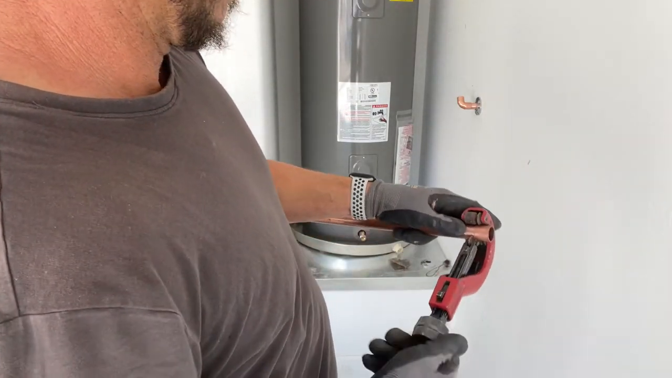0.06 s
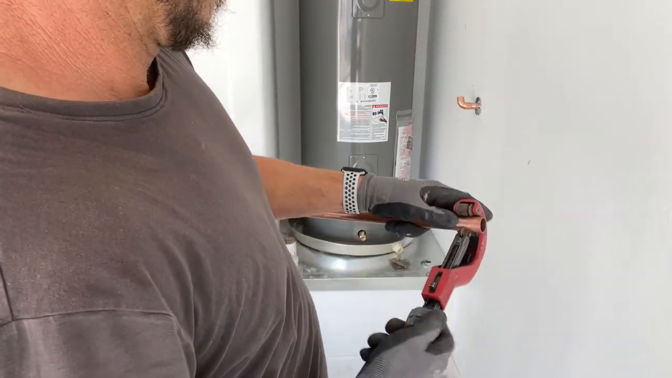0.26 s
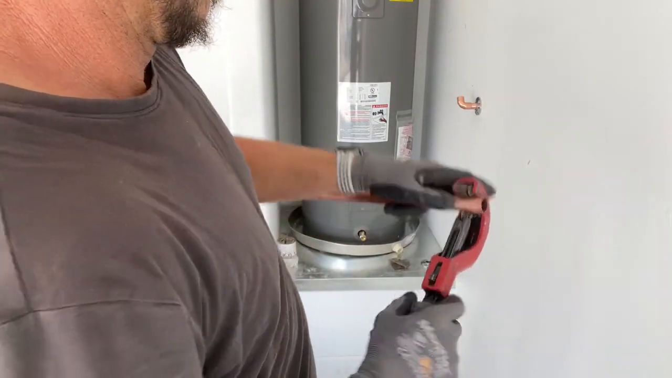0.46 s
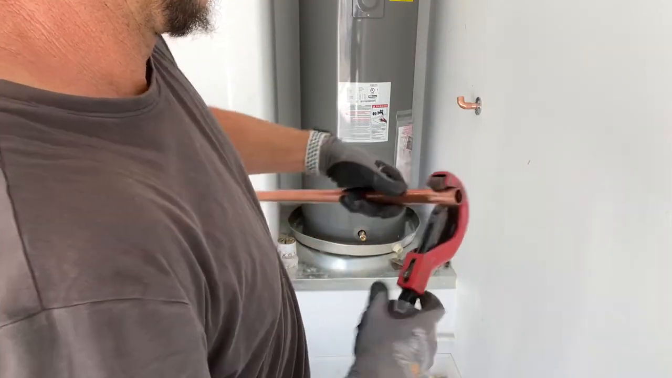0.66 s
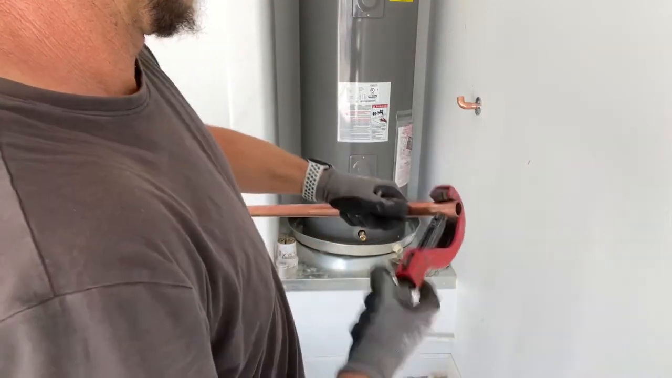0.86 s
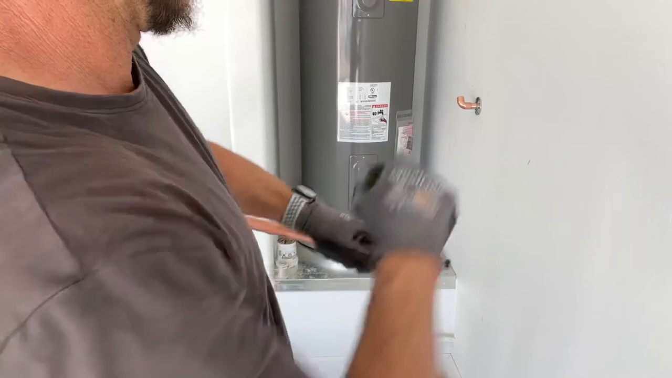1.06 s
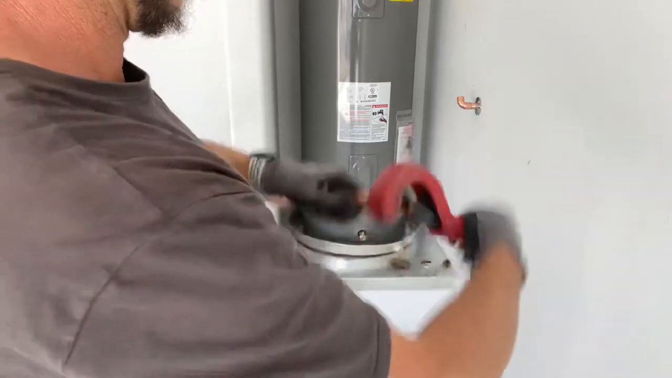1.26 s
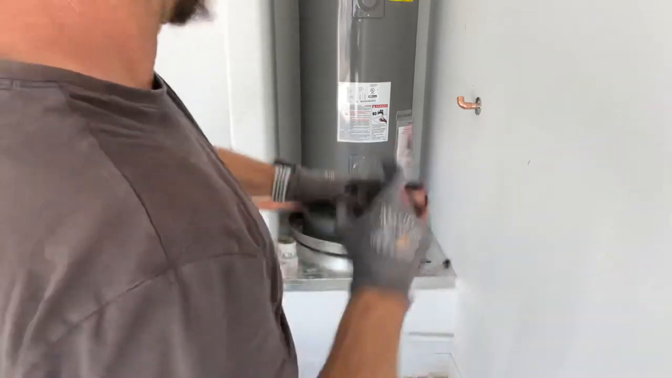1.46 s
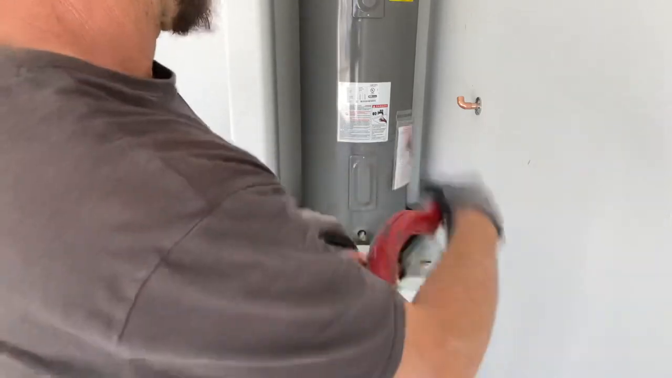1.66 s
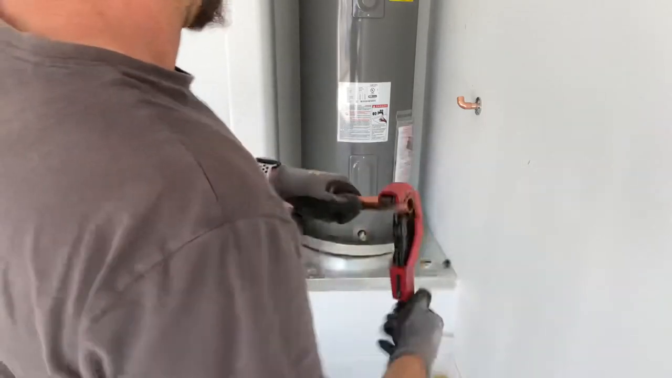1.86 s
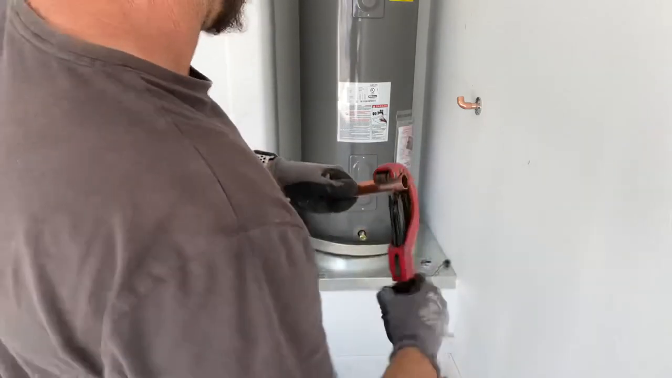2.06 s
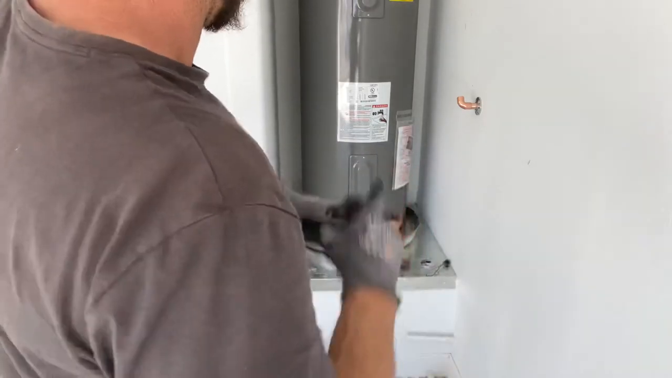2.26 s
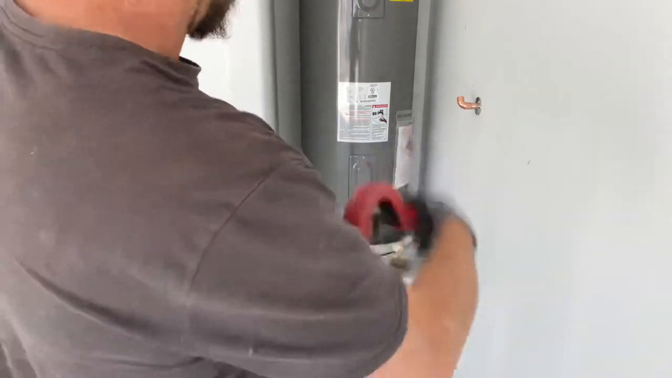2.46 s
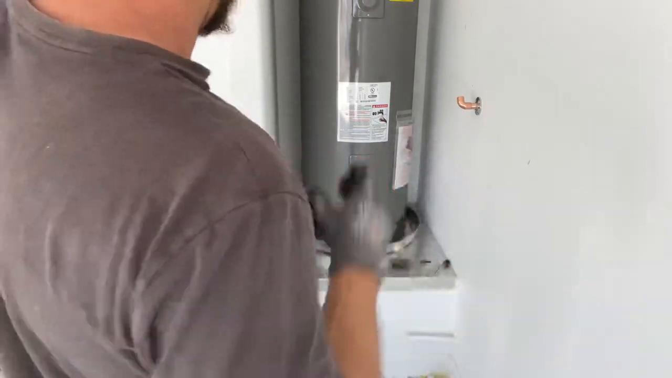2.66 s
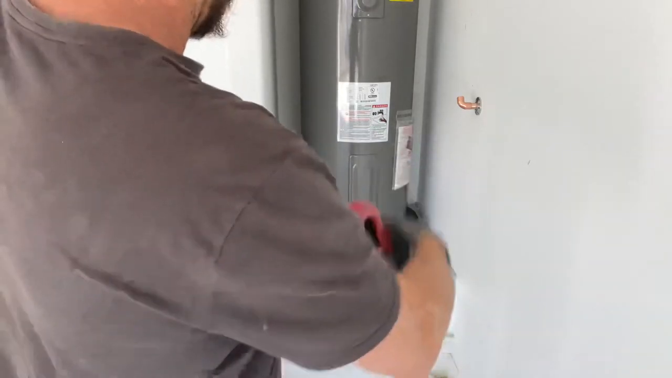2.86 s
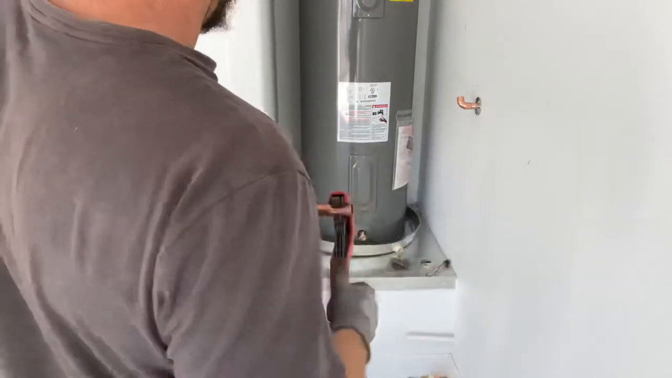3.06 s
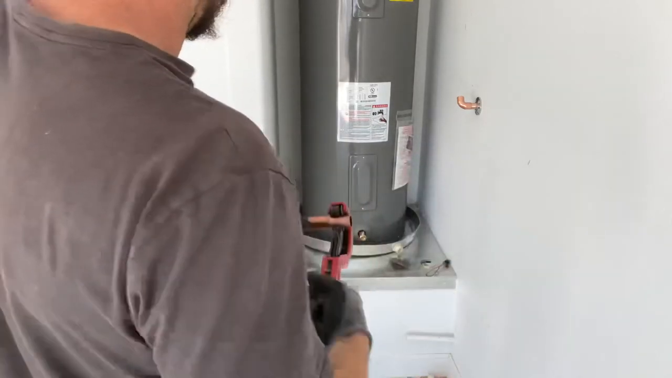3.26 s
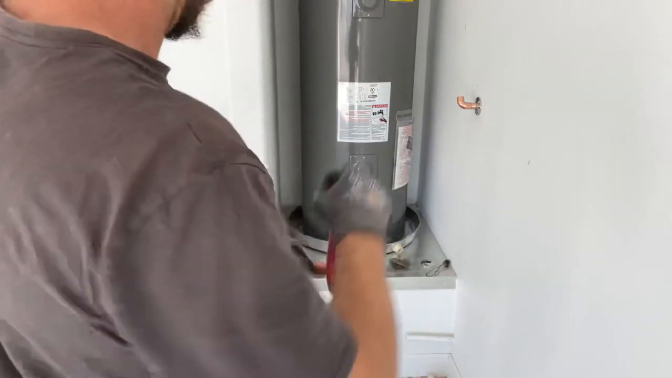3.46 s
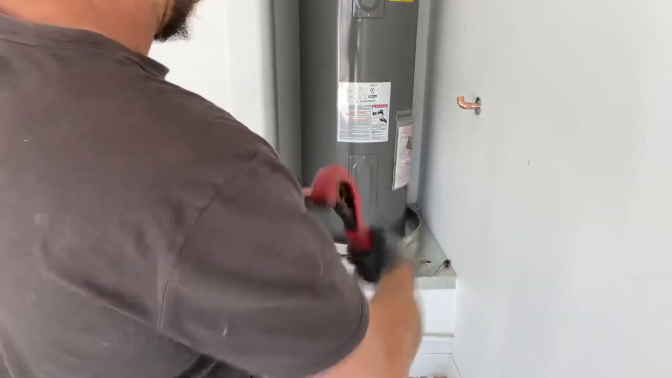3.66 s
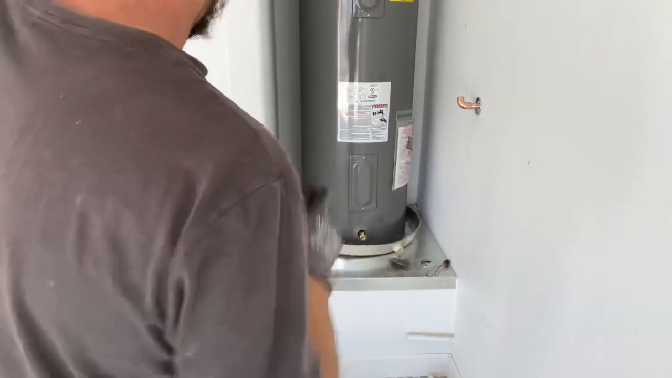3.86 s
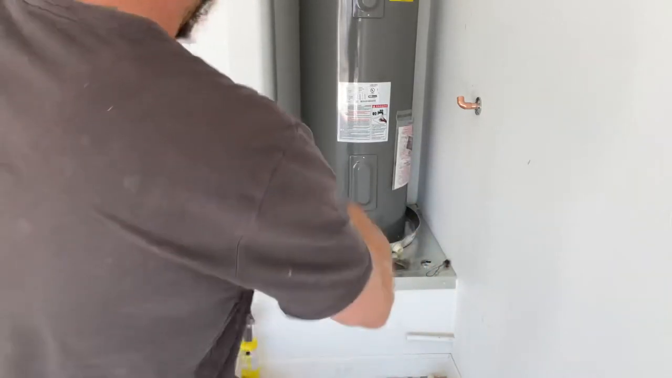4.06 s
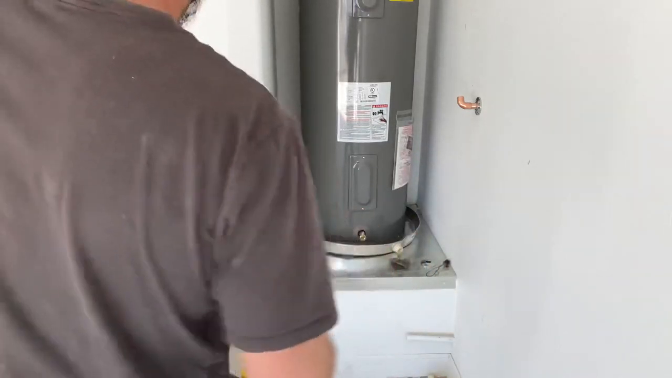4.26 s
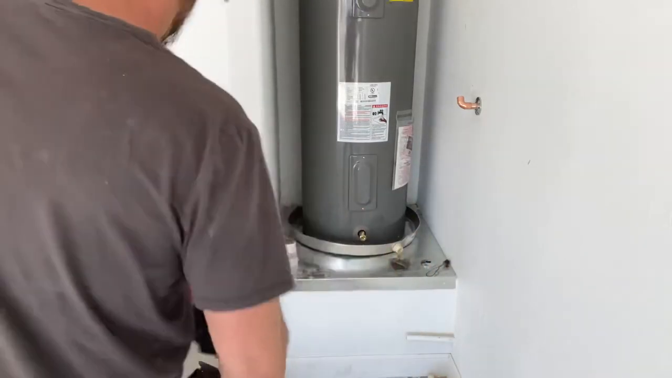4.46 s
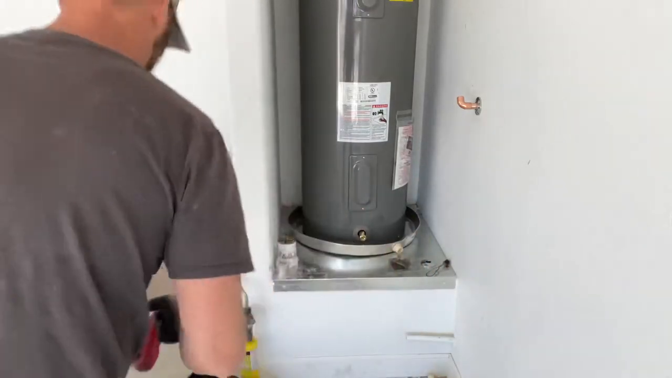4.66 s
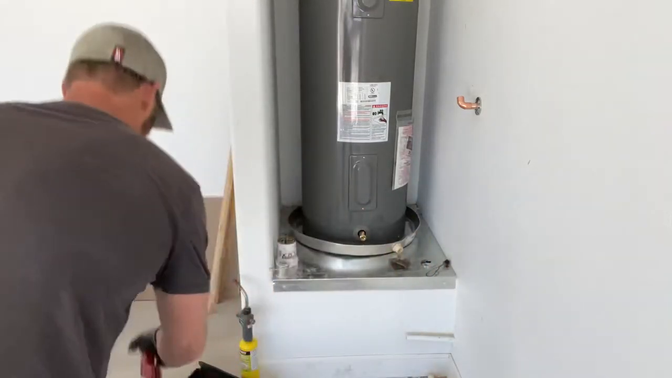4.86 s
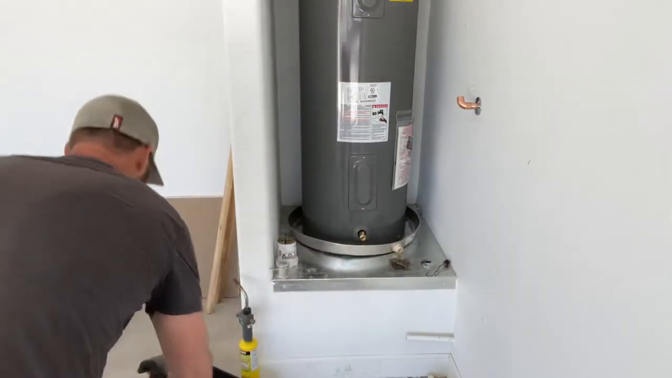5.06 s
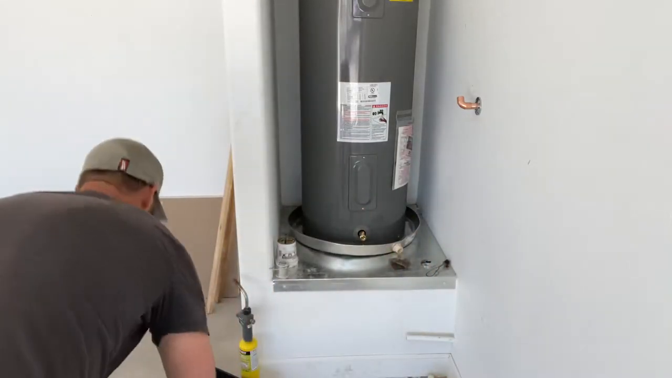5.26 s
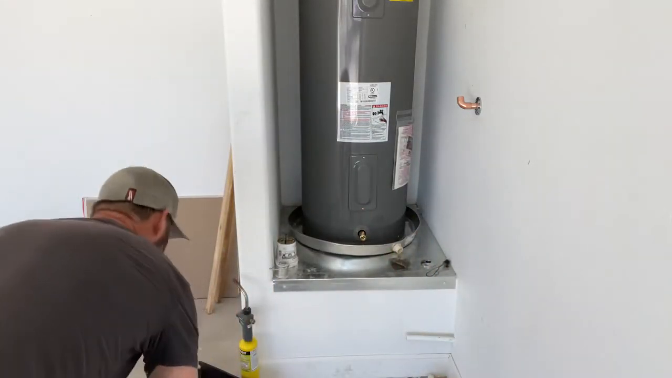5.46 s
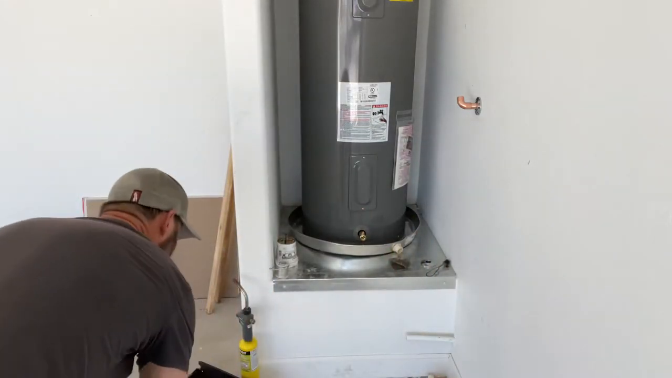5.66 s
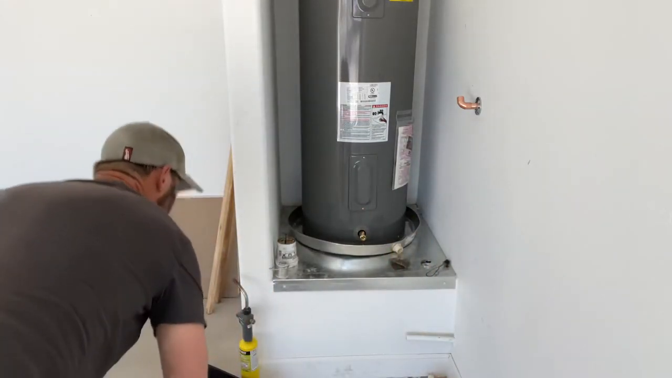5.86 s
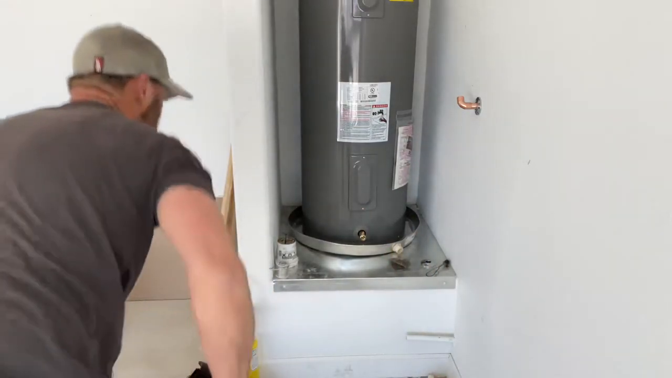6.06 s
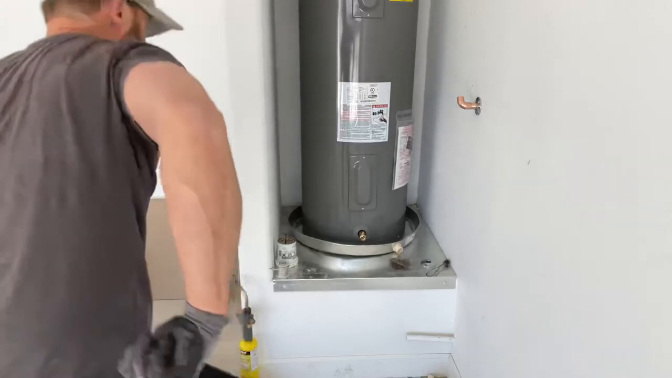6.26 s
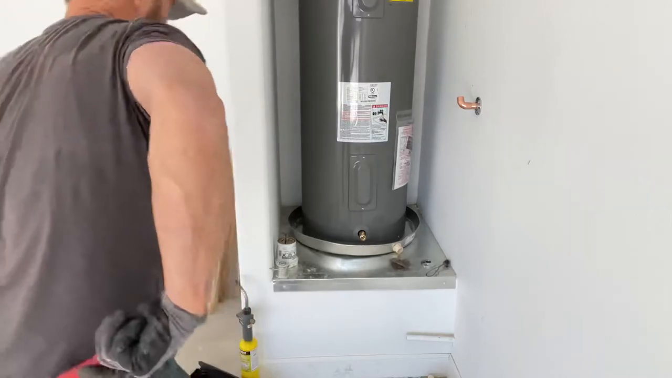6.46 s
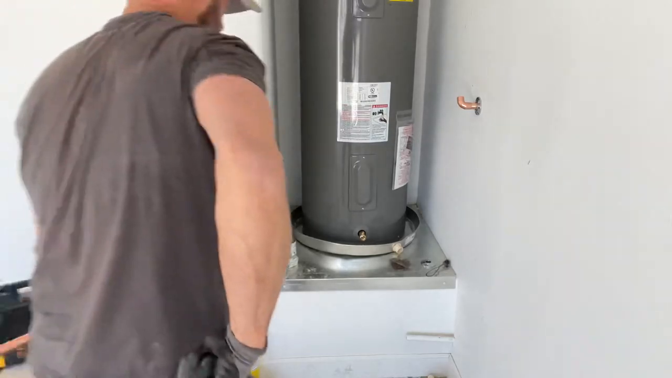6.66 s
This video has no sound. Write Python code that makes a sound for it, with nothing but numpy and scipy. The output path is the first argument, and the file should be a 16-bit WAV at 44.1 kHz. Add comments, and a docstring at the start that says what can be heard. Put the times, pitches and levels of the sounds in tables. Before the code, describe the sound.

A bare, hard-walled room with a quiet, wavering low hum, soft rumble and air throughout, heard fairly close in stereo. From 0 to 1 s a tubing cutter gives small, sparse clicks with light glove rubbing. At about 1.2 s the clicks become firmer, clustering around 1.5 to 1.7 s, with strong ones near 2.2, 2.4 and 2.7 s among scraping rustle and cloth swishes. A quieter stretch of handling follows, with faint clicks from 3.4 s, a clearer one at 3.8 s and a crisp, loud group at 4.75 s. Small clicks continue to 5.4 s. At 5.47 s a tiny metal piece chinks brightly and bounces; from 5.63 to 5.8 s the tube lands in a rapid, dull, hollow clatter, its low ring fading over a second. Soft swishes and faint knocks at 6.35 to 6.65 s end it.

```python
"""In a bare, hard-walled room a tubing cutter is tightened and swung round a copper tube; gloves rub.
Its body clicks as short bursts through resonances; rubbing, rustle and swishes are shaped noise.
A small metal piece chinks on the floor, then the tube is laid down with a hollow clatter and a long
ring: both are noise bursts with damped modes. Near walls and a diffuse tail answer every blow.
A low hum near 77 Hz, a sine of drifting pitch and level, lies under it with rumble, mains tones and air."""
import sys
import numpy as np
from scipy import signal
from scipy.fft import rfft, irfft, next_fast_len
from scipy.io import wavfile
from scipy.ndimage import map_coordinates

SR = 44100
rng = np.random.default_rng(int(sys.argv[2]) if len(sys.argv) > 2 else 0)


def wrap_up_sound(samples):
    """Save the sound to the file named by the first command line argument, as 16-bit audio."""
    columns = np.atleast_2d(samples).T
    # keep every value between -1 and 1, then stretch to whole-number steps
    tamed = np.clip(columns, -1, 1)
    steps = np.round(tamed * 32767).astype(np.int16)
    wavfile.write(sys.argv[1], SR, steps)


def nominal_scale(level):
    """Amplitude ratio for a level in decibels (scalar or array-like)."""
    x = np.asarray(level, float) / 20
    return 10 ** x


N = 295911  # samples


# Resonances of the cutter body: pitch_hz, width_hz (before narrowing), level_db
CUTTER_RESONANCES = [(980, 71, 0.5), (1466, 50, 3.5), (1940, 520, -11.5), (2400, 216, 4.5),
                     (2647, 660, -5.5), (3120, 324, 3), (3700, 190, -7), (4400, 13, 1), (4750, 37, -40),
                     (7430, 1640, -5)]


def cutter_body(f):
    """Modal superposition: resonances of alternating sign add to a flat direct path."""
    response = 0.45
    for k, (hz, width, db) in enumerate(CUTTER_RESONANCES):
        response = response + (-1) ** k * nominal_scale(db) * bell(f, hz, 0.66 * width / hz)
    return response


def bright_edge(hz, t):
    """Band-pass filtering: a noise burst falling 60 dB in 16 ms is confined round one high pitch."""
    burst = nominal_scale(-60 * t / 0.016) * rng.standard_normal(len(t))
    return peaked(filtered(burst, lambda f: bell(f, hz, 1.0) ** 2))


# Cutter contacts: start_s, level_db (peak of the direct body sound), colour_hz,
# breadth (of each of two cascaded filters, share of colour_hz), room_db (tail against direct sound)
CLICKS = [(0.171, -36.5, 2400, 0.34, -5), (0.312, -51.5, 2020, 0.81, -12), (0.331, -43, 1040, 0.92, 1),
          (0.435, -41, 1520, 0.49, -21), (0.745, -39, 1470, 0.42, -5.5), (0.828, -41.5, 1010, 1.5, -6),
          (0.909, -41, 970, 3.2, 0.5), (0.945, -44.5, 1590, 1.2, -3), (1.232, -25.5, 2100, 2.6, 1),
          (1.432, -32, 2450, 0.78, -6.5), (1.503, -27.5, 2820, 1.17, -5.5), (1.544, -36, 1940, 1.44, -1),
          (1.637, -31.5, 3070, 1.4, 0.5), (1.655, -23, 2220, 0.98, -3), (1.874, -36, 2260, 1.1, -4),
          (2.167, -37, 1940, 0.96, 9), (2.182, -22, 1880, 1.24, -4), (2.376, -17.5, 2050, 2.18, -0.5),
          (2.613, -37.5, 2640, 1.1, 0), (2.705, -25, 1620, 2.1, 2.6), (3.446, -41, 2770, 0.52, 2),
          (3.571, -41.5, 2780, 2.5, 4.5), (3.776, -40, 1480, 1.54, 13.5), (3.809, -25.5, 2570, 1.67, 0),
          (3.929, -40, 1960, 0.61, 0.5), (4.348, -37, 2400, 1.55, 0.9), (4.519, -47.5, 1800, 1.05, 6),
          (4.742, -36, 2900, 1.3, 11), (4.75, -20, 2870, 1.49, 3.5), (4.78, -25.5, 2630, 0.98, 3.5),
          (4.813, -29.5, 2560, 1, 3), (5.011, -39, 2260, 2.05, 8), (5.055, -52, 2520, 1.6, 1),
          (5.291, -39.5, 3830, 1.44, 9.5), (5.355, -38.5, 1230, 1.1, 3.5)]


def cutter_clicks():
    """Impulse excitation: a blow and short chatter drive the resonances that its place makes speak."""
    out, t = np.zeros((2, N)), np.arange(SR // 20) / SR
    for start, db, hz, breadth, room_db in CLICKS:
        chatter = 0.25 * nominal_scale(-60 * t / 0.02) * rng.standard_normal(len(t))
        blow = chatter + (t == 0)

        def colour(f):
            """Spectral weighting: the place of the blow selects modes; broad blows also thump the tube."""
            return cutter_body(f) * bell(f, hz, breadth) ** 2 + 0.1 * breadth * bell(f, 1110, 1.0) ** 2

        click = peaked(filtered(blow, colour))
        click = click + nominal_scale(-31) * bright_edge(11000, t)  # treble edge, dB under the peak
        add(out, start, room(nominal_scale(db) * click, room_db, onset=0.0027))
    return out


# Bright treble edge of some cutter clicks: start_s, level_db (peak of the direct sound), pitch_hz
BRIGHT_EDGES = [(0.171, -33, 6900), (0.332, -46.5, 7000), (1.232, -33, 9500), (2.165, -45, 7300),
                (2.181, -35, 7200), (4.059, -39.5, 10500), (5.292, -38.5, 10560), (5.356, -37.5, 9900)]


def bright_click_edges():
    """Short transients have broad spectra: some cutter clicks carry a bright treble edge."""
    out, t = np.zeros((2, N)), np.arange(SR // 20) / SR
    for start, db, hz in BRIGHT_EDGES:
        add(out, start, room(nominal_scale(db) * bright_edge(hz, t), 0.52, onset=0.0027))
    return out


# Landing and bounces of the small piece: start_s, level_db (before the attack), clatter_db (against ring)
CHINKS = [(5.462, -30, 1), (5.470, -18.5, 0), (5.495, -25.5, 0), (5.509, -22.5, -3), (5.574, -30.5, -7),
          (5.594, -29.5, -7)]
# Modes of the small piece: pitch_hz, level_db (mean), t60_s
PIECE_MODES = [(2503, -7, .03), (3537, -3, .04), (4420, -7, .03), (4753, -8, .03), (9900, 3, .055),
               (10050, -1, .05), (11440, -8, .03), (12070, 2, .05), (12900, -1, .025)]


def small_piece():
    """Free vibration after impact: every bounce clatters and excites short modes, carried on by the room."""
    out, t = np.zeros((2, N)), np.arange(SR // 4) / SR
    attack = 1 - np.exp(-t / 0.00053)
    for start, db, clatter_db in CHINKS:
        burst = nominal_scale(-60 * t / 0.043) * rng.standard_normal(len(t))
        clatter = peaked(filtered(burst, lambda f: bell(f, 3000, 4.6) ** 2))
        ring = peaked(ringing(PIECE_MODES, t, scatter_db=2.5))
        chink = attack * (ring + nominal_scale(clatter_db) * clatter)
        add(out, start, room(nominal_scale(db) * chink, 0.38, onset=0.006))
    return out


# Dull blows of tube and tools: start_s, level_db (peak of the direct thud), colour_hz,
# crack_db (against thud), ring_db (against thud, before its attack)
KNOCKS = [(1.473, -45, 196, -22, -38), (1.502, -35, 188, -18, -11.5), (4.286, -45.5, 890, -7, -25),
          (4.31, -48, 1100, -7, -21), (5.633, -22, 627, -3.5, -8), (5.649, -21, 378, -18, -7.5),
          (5.672, -17, 350.5, -6.5, -1.5), (5.683, -14.5, 504, -20.5, -6.5), (5.697, -15, 390, -17, -6),
          (5.718, -18, 680, -9, -16), (5.733, -20.5, 330, -34, -2), (5.759, -26.5, 334, -28, 1.5),
          (5.791, -28, 325, -30, -0.2), (6.348, -43.5, 490, 4.5, -27), (6.504, -46.5, 524, -7.5, -27),
          (6.567, -35, 760, -8, -26), (6.663, -49.5, 543, 2, -27)]
# Modes of the tube: pitch_hz, level_db (mean), t60_s
TUBE_MODES = [(156, 4.5, 0.19), (275, -18, 2.42), (310.4, -8, 0.61), (320.6, 2.5, 1.75), (342.6, 5.5, 1.41),
              (383, -26, 0.49), (395.3, 0, 0.35), (465, -12, 0.89), (537, -8.5, 1.1), (668, -3.5, 1.37),
              (716, 1, 0.36), (721, -8.5, 0.77), (920, -29, 0.32)]
# Spectrum of the thud before colouring: pitch_hz, level_db (relative, per Hz)
THUD_SPECTRUM = [(50, -26), (150, -8), (330, -4), (1000, -6), (2200, -13), (4000, -21), (9000, -79)]


def tube_knocks():
    """Forced and free vibration: a dull thud and thin crack pass, while the long tube rings on close by."""
    out, t = np.zeros((2, N)), np.arange(SR) / SR
    for start, db, hz, crack_db, ring_db in KNOCKS:
        burst = rng.standard_normal((2, len(t)))

        def colour(f):
            """Spectral weighting: one resonance raises part of the thud."""
            return nominal_scale(along(THUD_SPECTRUM, f)) * (0.41 + 0.85 * abs(bell(f, hz, 0.21)))

        thud_swell = (1 - np.exp(-t / 0.0012)) * nominal_scale(-60 * t / 0.05)
        thud = peaked(thud_swell * filtered(burst[0], colour))
        crack = peaked(nominal_scale(-60 * t / 0.02) * filtered(burst[1], lambda f: bell(f, 3500, 1.5)))
        ring = peaked(ringing(TUBE_MODES, t, scatter_db=3.0)) * (1 - np.exp(-t / 0.0064))
        add(out, start, room(nominal_scale(db) * (thud + nominal_scale(crack_db) * crack), 2.7, onset=0.0023))
        add(out, start, room(nominal_scale(db + ring_db) * ring, -7.5, onset=0.03))
    return out


# Level of the rubbing and handling rustle, with some of the room's swell round the blows:
# time_s, level_db (mean)
RUSTLE_LEVEL = [(0, -64.5), (.14, -95), (.42, -60), (.72, -70.5), (1.2, -54.5), (1.62, -55.5),
                (2.14, -61.5), (2.35, -52), (3.0, -64), (3.2, -70), (3.42, -57.5), (4.05, -58), (4.5, -65),
                (5.25, -58), (5.6, -48.5), (6.3, -61.5), (6.55, -69), (6.71, -70)]
# Spectrum of the rustle: pitch_hz, level_db (relative, per Hz)
RUSTLE_SPECTRUM = [(240, -13), (400, -17), (453, 3.5), (501, -3.5), (807, 0.5), (1650, -0.5), (2860, -5.5),
                   (8000, -22), (10400, -21), (17600, -120)]


def handling_rustle():
    """Amplitude-modulated noise: rubbing and handling rustle in grains of uneven strength."""
    level_db = curves(RUSTLE_LEVEL)[0] + 1.5 * wobble(8)
    return nominal_scale(level_db) * rush(RUSTLE_SPECTRUM, grain_db=3, grain_hz=150)


# Swishes of glove and cloth: peak_s, level_db (mean), rise_s, fall_s (each spans 20 dB)
SWISHES = [(0, -76, 0.22, 0.12), (.56, -63.5, .3, 0.17), (.92, -66, 0.093, 0.094), (1.36, -58.5, 1.6, 1.7),
           (1.78, -72, 0.7, .6), (2.58, -59.5, 0.54, .9), (2.95, -60.5, .6, 0.073), (3.33, -60.5, 0.1, 1.1),
           (3.74, -62, 1.2, 0.41), (4.2, -61.5, 1.6, .2), (4.66, -65.5, 0.45, 0.76), (5.14, -65, .3, 1),
           (5.63, -50, .06, 0.092), (6.0, -57, 0.098, 0.26), (6.71, -56, .2, .2)]
# Spectrum of the swishes: pitch_hz, level_db (relative, per Hz)
SWISH_SPECTRUM = [(5000, 2), (7000, -5), (8500, -4), (10300, 0), (12000, -1), (15500, -9)]


def glove_swishes():
    """Incoherent addition: overlapping swishes of glove and cloth sum as powers."""
    t = np.arange(N) / SR
    power = np.zeros(N)
    for peak, db, rise, fall in SWISHES:
        fade_db = 20 * np.maximum((peak - t) / rise, (t - peak) / fall)
        power += nominal_scale(db - fade_db) ** 2
    level = np.sqrt(power) * nominal_scale(1.5 * wobble(15))
    return level * rush(SWISH_SPECTRUM, grain_db=1.0, grain_hz=284)


# One chance course of a narrow low noise near 77 Hz, wavering in pitch and level:
# time_s, pitch_hz (mean), level_db (mean, rms)
LOW_NOISE_COURSE = [(0.0, 85.1, -49), (1.34, 75.5, -55), (1.44, 80.6, -51.5), (1.85, 74.4, -49),
                    (2.28, 83.4, -50.5), (3.48, 71.3, -50.5), (3.53, 77.3, -46.5), (4.26, 75.7, -53),
                    (4.32, 70.0, -50), (4.8, 80, -52), (5.51, 76, -52), (5.66, 89.8, -54), (5.85, 89, -52),
                    (6.02, 74.4, -55), (6.19, 91.7, -63), (6.32, 76.2, -67), (6.52, 68.2, -61),
                    (6.71, 80.6, -52.5)]


def narrow_low_noise():
    """Narrow-band noise as a modulated sine: its pitch and level waver at random about one chance course."""
    hz, db = curves(LOW_NOISE_COURSE)
    phase = 2 * np.pi * np.cumsum(hz + 2.68 * wobble(17)) / SR
    return np.sqrt(2) * nominal_scale(db + 1.65 * wobble(9)) * np.sin(phase)


# Faint mains tones: pitch_hz, level_db (mean, rms)
MAINS = [(120, -65), (240, -71.5)]


def mains_tones():
    """Harmonic tones: steady pitches whose levels waver slowly."""
    t = np.arange(N) / SR
    out = np.zeros(N)
    for hz, db in MAINS:
        out += np.sqrt(2) * nominal_scale(db + 1.4 * wobble(2.85)) * np.sin(2 * np.pi * hz * t)
    return out


# Rumble round the low hum: pitch_hz, level_db (relative, per Hz)
RUMBLE_SPECTRUM = [(15, -28), (25, -28), (65, 14), (86, 3.5), (110, -17), (140, -31), (240, -120)]
# Air of the room: pitch_hz, level_db (relative, per Hz)
AIR_SPECTRUM = [(56, -17.5), (95, -2.5), (108, -7), (250, -17.5), (302, -15.5), (329, -17.5), (364, -19),
                (465, -19), (972, -31), (3000, -55.5), (3900, -88), (6600, -120)]


def background():
    """Superposition: low hum and mains tones lie in rumble and the room's air, both random noise."""
    rumble = nominal_scale(-54) * rush(RUMBLE_SPECTRUM)
    air = nominal_scale(-55.5) * rush(AIR_SPECTRUM, grain_db=1.5, grain_hz=8.6)
    return narrow_low_noise() + mains_tones() + rumble + air


# Decay of the diffuse tail: pitch_hz, t60_s
ROOM_DECAY = [(150, 0.76), (500, 1.035), (2000, 1), (5000, 0.67), (8000, 0.38), (13000, 0.48)]
# Copies off near walls: left_delay_s, right_delay_s, level_db (before dulling)
WALLS = [(.0068, .0072, -10), (.0104, .0099, -10), (.0163, .0168, -14), (.0361, .0355, -11)]


def room(x, wet_db, onset):
    """Convolution with a room response: direct sound, dulled wall copies, and a fresh diffuse tail."""
    hz, t, z = signal.stft(rng.standard_normal((2, SR)), SR, nperseg=256)
    decay = nominal_scale(-60 * t / along(ROOM_DECAY, hz)[:, None])
    tail = signal.istft(z * decay, SR, nperseg=256)[1][:, :SR]
    build_up = 1 - np.exp(-(np.arange(SR) / SR / onset) ** 2)
    tail = paired(tail * build_up, np.ones_like)
    walls = np.zeros((2, SR))
    for left_s, right_s, db in WALLS:
        walls[[0, 1], [round(left_s * SR), round(right_s * SR)]] = nominal_scale(db)
    dulled = filtered(walls, lambda f: 1 / (1 + 1j * f / 6000))
    reply = nominal_scale(wet_db) * tail / np.linalg.norm(tail[0]) + dulled
    reply[:, 0] += 1  # direct sound
    return signal.fftconvolve(x[None], reply, axes=1)


# Left-right likeness of diffuse sound: pitch_hz, correlation (0 to 1)
LIKENESS = [(60, 0.7), (300, 0.56), (640, 0.011), (3000, 0.15), (12000, 0)]


def paired(pair, gain):
    """Interchannel coherence: two unrelated signals are mixed to the left-right likeness of the room."""
    def mid_side(hz):
        """Coherence is the cosine of twice the mixing angle."""
        angle = np.arccos(np.clip(along(LIKENESS, hz), -1, 1)) / 2
        return gain(hz) * np.array([np.cos(angle), np.sin(angle)])

    mid, side = filtered(pair, mid_side)
    return np.array([mid + side, mid - side])


def rush(spectrum, grain_db=0, grain_hz=200):
    """Filtered random noise: a stereo rush of rms 1, lumpy at the grain rate."""
    noise = rng.standard_normal((2, N)) * nominal_scale(grain_db * wobble(grain_hz))
    return unit(paired(noise, lambda hz: nominal_scale(along(spectrum, hz))))


def ringing(modes, t, scatter_db):
    """Modal decay: damped sines, struck at new strengths each time."""
    hz, db, t60 = np.transpose(modes)[:, :, None]
    db = db + scatter_db * rng.standard_normal(db.shape)
    return np.sum(nominal_scale(db - 60 * t / t60) * np.sin(2 * np.pi * hz * t), 0)


def bell(f, hz, share):
    """Second-order resonance: a band-pass response, share of its centre wide."""
    return 1j * f * share * hz / (hz * hz - f * f + 1j * f * share * hz)


def filtered(x, response):
    """Linear filtering: the spectrum of x times a complex response of frequency."""
    m = next_fast_len(x.shape[-1] + 8192)
    return irfft(rfft(x, m) * response(np.fft.rfftfreq(m, 1 / SR)), m)[..., :x.shape[-1]]


def wobble(rate):
    """Band-limited fluctuation: a smooth random curve, rate knots a second."""
    knots = rng.standard_normal(int(N * rate / SR) + 4)
    return map_coordinates(knots, [np.arange(N) * rate / SR])


def curves(rows):
    """Linear interpolation: one value per sample for each column after the time."""
    s, *cols = np.transpose(rows)
    return [np.interp(np.arange(N) / SR, s, c) for c in cols]


def along(points, hz):
    """Logarithmic frequency scale: (Hz, value) points read on a log axis."""
    f, v = np.transpose(points)
    return np.interp(np.log(hz + 1), np.log(f + 1), v)


def unit(x):
    """Effective value: scaled to rms 1."""
    return x / np.sqrt(np.mean(x ** 2) + 1e-20)


def peaked(x):
    """Peak amplitude: scaled to peak 1."""
    return x / np.abs(x).max()


def add(track, s, x):
    """Superposition: mixes x into the track from time s."""
    part = track[..., round(s * SR):][..., :x.shape[-1]]
    part += x[..., :part.shape[-1]]


def scene():
    """Superposition: everything in the room adds linearly."""
    cutter = cutter_clicks() + bright_click_edges()
    handling = handling_rustle() + glove_swishes()
    return cutter + small_piece() + tube_knocks() + handling + background()


def low_pass(x):
    """Removes everything above the highest recorded frequency."""
    return signal.sosfilt(signal.butter(12, 15800, fs=SR, output="sos"), x)


# Tone of the sum of left and right: pitch_hz, level_db
SUM_TONE = [(30, 0), (6400, 2.5), (7100, -2.5), (8400, -4.5), (9200, -1), (13000, -5), (15000, -24),
            (15800, -43)]
# Tone of the difference of left and right: pitch_hz, level_db
DIFFERENCE_TONE = [(40, -11), (200, 2), (8400, 4), (9600, -2), (11000, -15.5), (15800, -30)]


def record(dry):
    """Sum and difference filtering: the sum thins near 8 kHz; bass and top treble are narrowed."""
    halves = np.array([dry[0] + dry[1], dry[0] - dry[1]]) / 2
    mid, side = filtered(halves, lambda hz: nominal_scale([along(SUM_TONE, hz), along(DIFFERENCE_TONE, hz)]))
    balance = nominal_scale([[-0.3], [0.3]])  # left, right
    return low_pass(np.array([mid + side, mid - side]) * balance)


dry = scene()
out = record(dry)
wrap_up_sound(out)
```